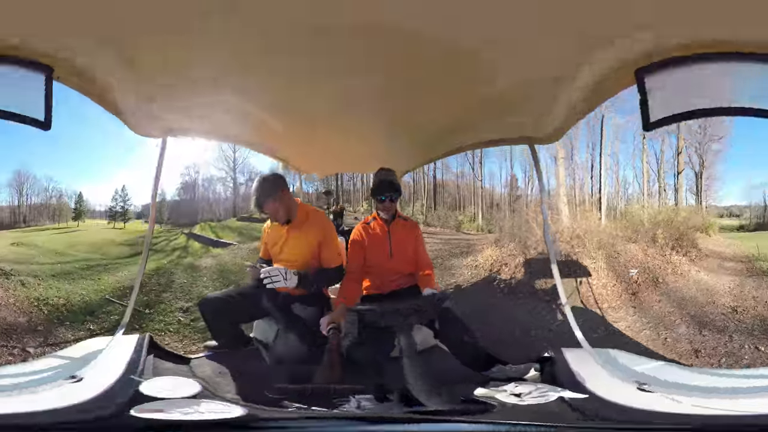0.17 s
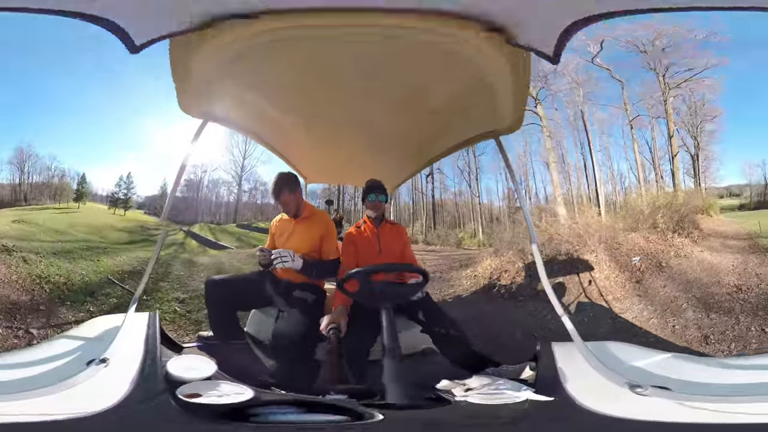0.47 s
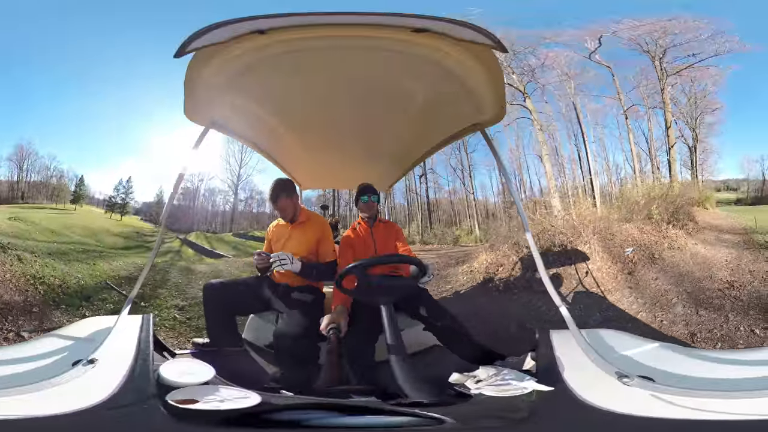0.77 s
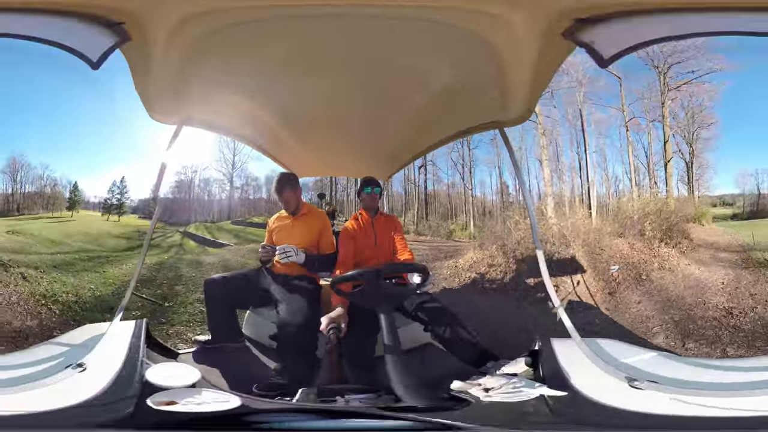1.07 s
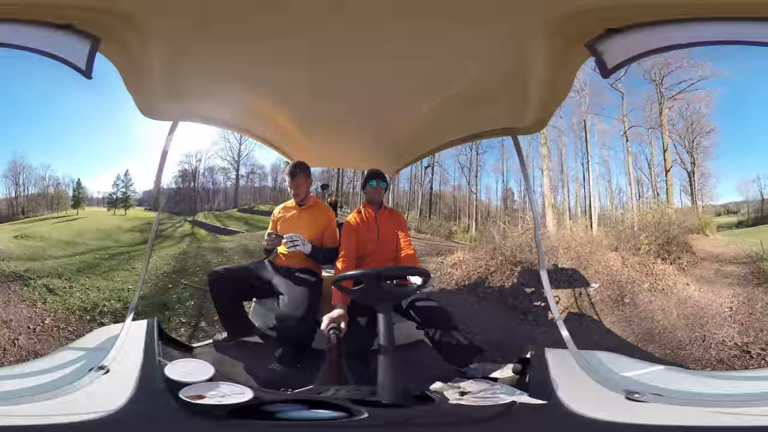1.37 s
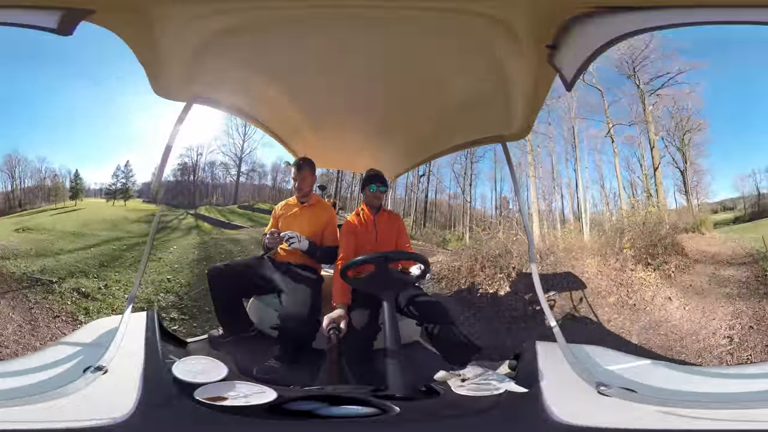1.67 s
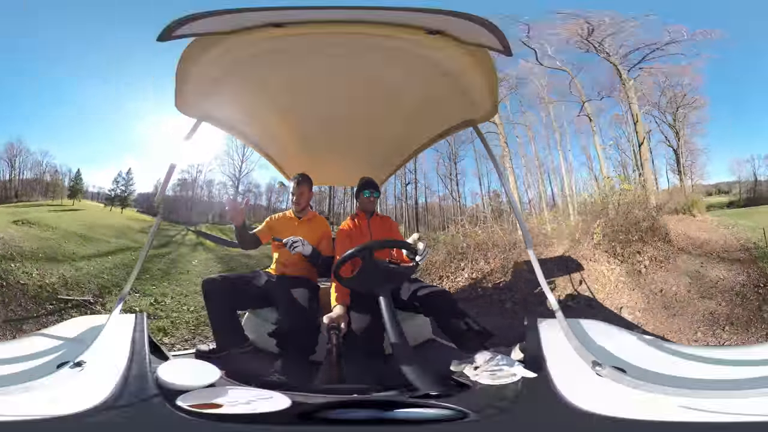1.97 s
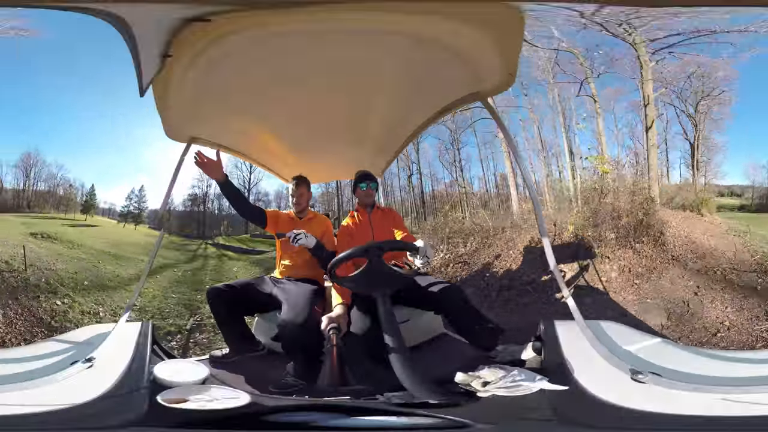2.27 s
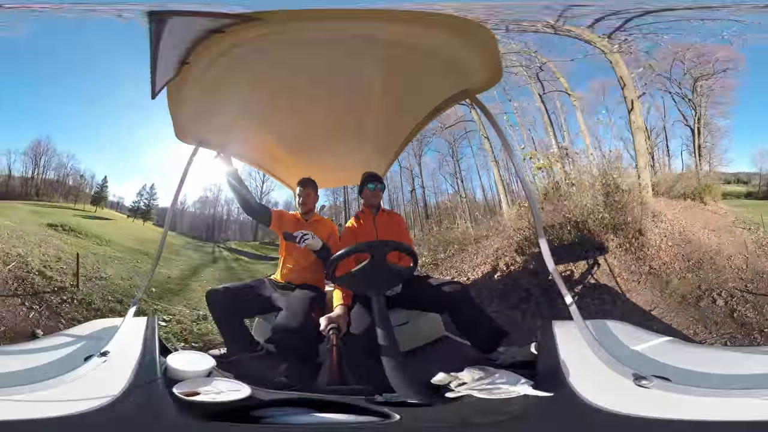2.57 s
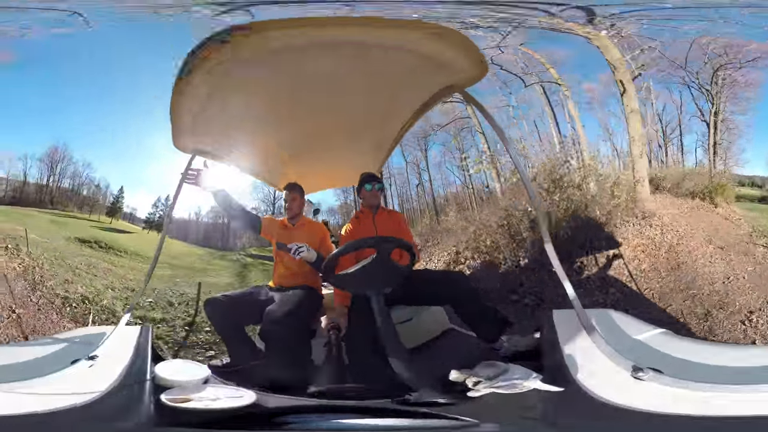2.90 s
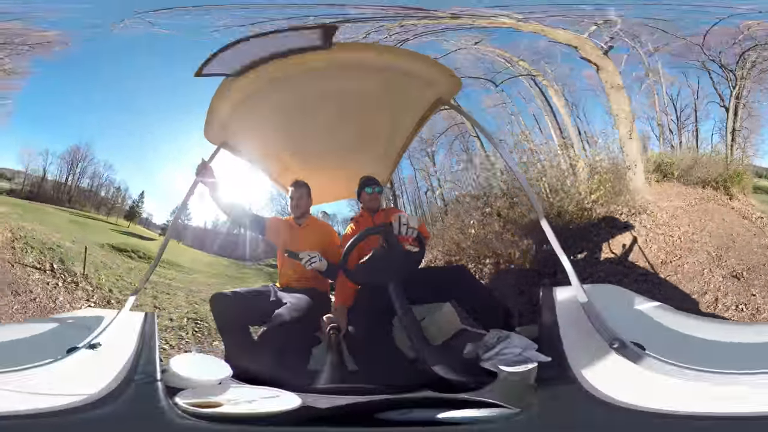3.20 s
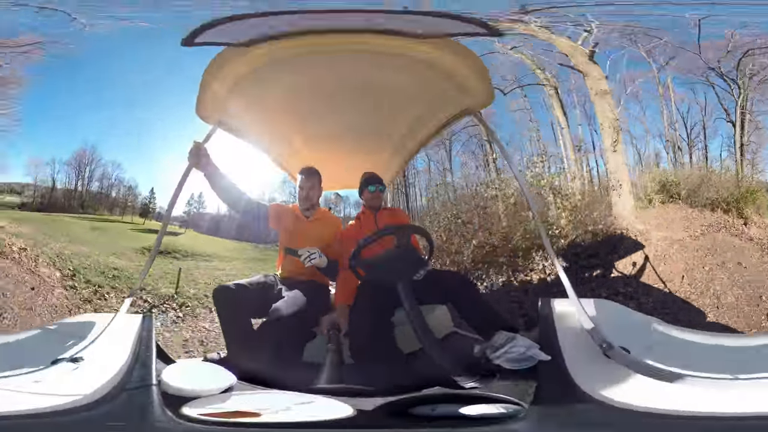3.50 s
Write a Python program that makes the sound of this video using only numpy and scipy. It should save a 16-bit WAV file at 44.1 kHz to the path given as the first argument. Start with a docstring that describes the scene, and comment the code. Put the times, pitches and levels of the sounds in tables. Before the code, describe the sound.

Petrol golf cart pulling away, metallic latch clatter, engine puffs, wind rumble and crackling twigs.

```python
"""A petrol golf cart pulls away on a leafy path, heard by a small camera's microphone on its dashboard.
Bursts of noise are the one-cylinder engine's puffs, quickening into a regular throb over a varying hiss.
Filtered impulses and short wavelets are wind buffeting the microphone in low thumps and flutters.
The brake latch clanks free as noise rattling a bank of decaying modes, with added rings; dense grains
rustle as leaves and running gear; coloured cracks with short rings are twigs and small parts.
"""
import sys
import numpy as np
from scipy import signal
from scipy.fft import rfft, irfft
from scipy.io import wavfile
from scipy.ndimage import uniform_filter1d, minimum_filter1d

SR = 44100
rng = np.random.default_rng(int(sys.argv[2]) if len(sys.argv) > 2 else 0)


def dump_mix(stems):
    """Bounce the given channels to the path in sys.argv[1] as a 16-bit WAV at rate SR."""
    frames = np.atleast_2d(stems).T  # one column per channel
    limited = np.clip(frames, -1, 1)  # hard clip at full scale
    pcm = np.round(limited * 32767).astype(np.int16)
    wavfile.write(sys.argv[1], SR, pcm)


N = 160965
TIME_S = np.arange(N) / SR

# colour of leaves and twigs: pitch_hz [Hz], level_db [dB, relative]
LEAF_COLOUR = [(590, -27), (1000, -15), (1290, -21.5), (1570, -8.5), (2250, -6), (2470, -6), (2870, -6.5),
               (3610, -12), (5480, 0), (7150, 2), (9120, -10.5), (10500, -14.5), (12200, -4), (15000, -9.5),
               (15900, -15)]


def undb(db):
    """Gain of a level in dB."""
    return 10 ** (np.asarray(db) / 20)


def unit(x):
    """Scaled to rms 1."""
    return x / np.sqrt(np.mean(x ** 2))


def curve(table, column):
    """A table column joined by straight lines in time."""
    rows = np.array(table)
    return np.interp(TIME_S, rows[:, 0], rows[:, column])


def band(x, hz, width_hz):
    """Zero-phase band-pass, so that each impulse swells and fades evenly."""
    low = np.sqrt(hz ** 2 + width_hz ** 2 / 4) - width_hz / 2
    band_pass = signal.butter(2, [low, low + width_hz], "band", fs=SR, output="sos")
    return signal.sosfiltfilt(band_pass, x)


def grains(per_s, scatter_db):
    """Random impulses, a few of them much larger than the rest."""
    hit = rng.random(N) < per_s / SR
    return hit * rng.standard_normal(N) * undb(scatter_db * rng.exponential(size=N))


def walk(rate_hz):
    """Slow random curve, spread 1."""
    step = int(SR / rate_hz)
    held = np.repeat(rng.standard_normal(N // step + 1), step)
    return unit(uniform_filter1d(held, step)[:N])


def colour(x, table):
    """Shapes the spectrum; white noise of rms 1 stays near rms 1."""
    rows = np.array(table)
    hz = np.arange(N // 2 + 1) * SR / N
    gain = undb(np.interp(np.log(hz + 1), np.log(rows[:, 0]), rows[:, 1]))
    return irfft(rfft(x) * unit(gain), N)


def swell(start_s, attack_s, hold_s, t60_s):
    """Envelope: straight attack, hold, exponential release that falls 60 dB in t60_s."""
    t = TIME_S - start_s
    release_s = np.clip(t - attack_s - hold_s, 0, 3)
    return np.clip(t / attack_s, 0, 1) * undb(-60 * release_s / t60_s)


def ring(start_s, hz, t60_s, attack_s):
    """One decaying mode: a sine under a swell without hold."""
    return swell(start_s, attack_s, 0, t60_s) * np.sin(2 * np.pi * hz * TIME_S)


def wavelets(table, cycles):
    """Each row a sine of random phase that swells and fades, `cycles` long at half height."""
    out = np.zeros(N + SR)
    for start_s, db, hz in table:
        shape = np.hanning(int(cycles * 2 / hz * SR))
        phase = 2 * np.pi * rng.random()
        tone = np.sin(2 * np.pi * hz * np.arange(len(shape)) / SR + phase)
        i = int(start_s * SR)
        out[i:i + len(shape)] += undb(db) * shape * tone
    return out[:N]


def wind():
    """Eddies of five sizes press on the microphone; the strongest stand out as thumps and flutters."""
    # rms of each eddy size in time: time_s [s], then five level_db [dB], largest eddies to finest
    eddy_levels = [(0.08, -35.5, -41, -58, -54, -58), (0.12, -38, -37.5, -61, -79, -65),
                   (0.15, -29, -34, -39, -65, -88), (0.19, -28.5, -31.5, -58, -66, -73),
                   (0.31, -33.5, -35.5, -46.5, -44.5, -51), (0.35, -26.5, -36.5, -61, -54.5, -54),
                   (0.39, -28.5, -29, -54, -66, -73), (0.46, -20, -26.5, -57, -59, -68),
                   (0.5, -16.5, -24.5, -33, -68, -73), (0.54, -22, -32, -45.5, -52, -60),
                   (0.6, -40, -14, -29.5, -51, -68), (0.65, -16, -20, -37, -44.5, -58),
                   (0.75, -52, -24, -39.5, -52.5, -80), (0.78, -30, -28, -24, -51, -52),
                   (0.8, -16, -34.5, -39, -53, -75), (0.84, -50, -21, -49, -51, -71),
                   (0.87, -47, -34, -53, -67, -63), (0.9, -23.5, -20, -27.5, -46, -67),
                   (0.94, -29, -30, -49, -64, -61), (0.98, -24, -34, -66, -53, -63),
                   (1.03, -40, -33.5, -23.5, -54, -66), (1.06, -30.5, -38, -38.5, -64, -64),
                   (1.22, -46.5, -44, -59.5, -56.5, -67), (1.37, -32.5, -25.5, -42, -54.5, -62.5),
                   (1.48, -32, -43, -45, -53, -63), (1.52, -23, -24, -23, -58, -58),
                   (1.55, -32, -25, -19, -18.5, -41.5), (1.6, -32, -29, -45, -35, -57),
                   (1.63, -36, -26.5, -30, -53, -75), (1.69, -25, -26.5, -43.5, -16.5, -35),
                   (1.71, -48, -36, -38.5, -61, -72), (1.74, -33, -45, -33, -38, -70),
                   (1.76, -25, -18, -29, -29.5, -42), (1.84, -29.5, -32, -24.5, -27.5, -43),
                   (1.89, -32.5, -19, -37.5, -56.5, -68), (2.1, -36, -37.5, -61.5, -55, -63),
                   (2.21, -32, -27, -54, -55, -63), (2.26, -25, -21.5, -22, -38.5, -52),
                   (2.34, -25, -27.5, -52, -59, -61.5), (2.38, -60, -31.5, -58, -51, -60),
                   (2.4, -37, -11.5, -51, -46, -40.5), (2.42, -24, -32, -36, -50, -80),
                   (2.48, -44, -24, -43, -59, -60.5), (2.51, -38, -18.5, -39.5, -49.5, -59),
                   (2.6, -34, -28, -51, -66, -70), (2.66, -34, -29, -43.5, -51, -65),
                   (2.74, -31, -36, -32.5, -63, -65), (2.79, -27, -19, -52, -48.5, -59),
                   (2.84, -25.5, -23.5, -47, -51, -78), (2.87, -17, -14, -38, -49, -50.5),
                   (2.89, -44, -22, -40, -54.5, -71), (3.03, -40.5, -38, -57, -61.5, -68),
                   (3.18, -45, -29.5, -49, -59, -58), (3.2, -27.5, -32, -42, -51, -57.5),
                   (3.29, -38.5, -27.5, -48.5, -63.5, -64), (3.37, -34, -29.5, -35, -49, -61),
                   (3.39, -28.5, -57, -64, -65, -65), (3.43, -48, -52, -56.5, -58, -63),
                   (3.63, -36, -36.5, -53.5, -58.5, -62), (3.65, -51, -47, -42, -46, -64)]
    # eddy sizes, one row per level column: centre_hz [Hz], width_hz [Hz]
    eddy_sizes = [(55, 95), (160, 158), (340, 210), (580, 288), (1050, 850)]
    # strongest single buffets: start_s [s], peak_db [dB], pitch_hz [Hz]
    thumps = [(0.14, -32.5, 134), (0.251, -25, 169), (0.398, -24, 134), (0.427, -18.5, 109.6),
              (0.465, -18.5, 144), (0.499, -22.5, 110), (0.577, -13, 132), (0.605, -10, 202),
              (0.646, -11.5, 144), (0.667, -27, 108), (0.698, -21, 110), (0.717, -15, 185),
              (0.768, -22, 160), (0.838, -17, 152), (0.89, -22, 181), (0.966, -15, 153),
              (1.009, -16.5, 205), (1.075, -27.5, 110), (1.104, -23, 181), (1.377, -11.5, 186),
              (1.43, -20.5, 164), (1.53, -13.5, 148), (1.554, -16, 142), (1.616, -15.5, 239),
              (1.658, -18, 173), (1.703, -18.5, 121), (1.78, -14, 152), (1.873, -23.5, 162),
              (1.921, -15.5, 161), (2.007, -17.5, 145), (2.064, -20, 122), (2.115, -22.5, 117),
              (2.179, -14.5, 169), (2.241, -19, 205), (2.28, -13, 144), (2.39, -9, 199), (2.447, -19, 187),
              (2.481, -18.5, 112.4), (2.508, -13, 171), (2.542, -20, 191), (2.647, -13.5, 146),
              (2.699, -15, 151), (2.793, -8.5, 150), (2.863, -18, 134), (2.916, -24, 183),
              (3.182, -27, 175), (3.235, -26.5, 129), (3.351, -18, 232), (3.55, -24.5, 144.7)]
    # quick flutters of small eddies: start_s [s], level_db [dB, before the trim], pitch_hz [Hz]
    flutters = [(0.145, -31, 398), (0.506, -33, 382), (0.565, -22.5, 412), (0.586, -23, 427),
                (0.611, -28, 393), (0.634, -42, 414), (0.673, -31, 377), (0.719, -27, 382),
                (0.77, -33, 370), (0.841, -30, 425), (0.904, -20.5, 377), (0.973, -30, 457),
                (1.027, -24, 387), (1.042, -39, 466), (1.077, -38, 377), (1.107, -39, 416),
                (1.381, -35, 384), (1.509, -27, 407), (1.54, -10.5, 460), (1.574, -24, 517),
                (1.613, -20, 441), (1.639, -22, 610), (1.668, -17.5, 570), (1.684, -23.5, 583),
                (1.722, -21.5, 433), (1.76, -15, 422), (1.788, -14.5, 590), (1.813, -14, 490),
                (1.839, -20, 366), (1.911, -32, 380), (2.226, -26.5, 450), (2.254, -19, 430),
                (2.392, -24, 450), (2.454, -38, 500), (2.513, -35, 442), (2.641, -33, 440),
                (2.703, -45, 375), (2.781, -32, 398), (2.868, -30, 460), (3.357, -23, 382),
                (3.484, -36, 596)]
    eddies_per_cycle, scatter_db = 5, 1.5
    thump_cycles, flutter_cycles, flutter_trim_db = 1.87, 1.5, -1.5

    eddies = np.zeros(N)
    for column, (hz, width_hz) in enumerate(eddy_sizes, start=1):
        gusts = unit(band(grains(eddies_per_cycle * hz, scatter_db), hz, width_hz))
        eddies += undb(curve(eddy_levels, column)) * gusts
    fluttering = undb(flutter_trim_db) * wavelets(flutters, flutter_cycles)
    return eddies + wavelets(thumps, thump_cycles) + fluttering


def rustle():
    """Leaves and running gear: dense fine grains whose level flickers, coloured as leaves."""
    # time_s [s], level_db [dB, before the flicker]
    rustle_levels = [(.08, -62), (.12, -84), (.2, -76), (.36, -55.5), (.5, -73), (.8, -73.5), (1.0, -60.5),
                     (1.2, -58), (1.5, -56), (1.6, -67), (1.75, -62), (1.88, -69), (2.1, -64), (2.3, -62),
                     (2.385, -72), (2.405, -77), (2.55, -66), (2.69, -64), (2.8, -58.5), (2.86, -60),
                     (2.89, -65), (3.04, -68), (3.14, -57.5), (3.2, -50.5), (3.27, -55.5), (3.33, -46),
                     (3.37, -56), (3.44, -65), (3.52, -51), (3.58, -51), (3.61, -45.5), (3.65, -48)]
    grains_per_s, scatter_db = 9000, 3.5
    flicker_db, flicker_hz = -1, 21
    level_db = curve(rustle_levels, 1) + flicker_db * walk(flicker_hz)
    return colour(undb(level_db) * unit(grains(grains_per_s, scatter_db)), LEAF_COLOUR)


def engine():
    """A puff of gas each firing, slow and separate, then a regular throb; the hiss rises and falls."""
    # puffs while it gathers speed: start_s [s], level_db [dB, before colouring]
    puffs = [(0.518, -53), (0.626, -55.5), (0.717, -57.5), (0.8, -54), (0.868, -56.5), (0.934, -54.5),
             (0.996, -55), (1.06, -56), (1.12, -53.5), (1.178, -51), (1.24, -55.5), (1.296, -52.5),
             (1.353, -56), (1.404, -54), (1.456, -55.5), (1.504, -51), (1.552, -84)]
    # hiss of engine and drive: time_s [s], level_db [dB]
    drive_levels = [(.08, -68.5), (.5, -65.5), (1.0, -71), (1.5, -59.5), (1.9, -63), (2.385, -60.5),
                    (2.405, -65.5), (3.0, -64.5), (3.65, -62.5)]
    # colour of the engine's gas: pitch_hz [Hz], level_db [dB, relative]
    gas_colour = [(530, -30), (900, 5), (1240, -12), (1470, 0), (2110, -0.5), (2300, -3.5), (2690, -0.5),
                  (3900, -10), (5520, -2.5), (7280, -1.5), (8620, -12), (10300, -5.5), (11200, -16),
                  (12700, -2.5), (15900, -11.5)]
    puff_attack_s, puff_hold_s, puff_t60_s = 0.0033, 0.005, 0.24
    running_hz, running_db = 19.85, -2  # throb: firing rate, level against the hiss

    starting = np.zeros(N)
    for start_s, db in puffs:
        starting += undb(db) * swell(start_s, puff_attack_s, puff_hold_s, puff_t60_s)

    last_puff_s = puffs[-1][0]
    one_puff = swell(0, puff_attack_s, puff_hold_s, puff_t60_s)
    since_firing_s = (TIME_S - last_puff_s) % (1 / running_hz)
    throb = np.interp(since_firing_s, TIME_S, one_puff)
    is_running = TIME_S > last_puff_s + 1 / running_hz
    hiss_db = curve(drive_levels, 1)
    running = is_running * throb * undb(hiss_db + running_db)
    return colour((starting + running + undb(hiss_db)) * rng.standard_normal(N), gas_colour)


def latch():
    """Each blow of the brake latch rattles briefly, shakes all the modes and adds a ring at its own pitch."""
    # blows: start_s [s], rattle_db [dB, before colouring], rattle_hold_s [s],
    # pitch_hz of the added ring [Hz], ring_db [dB]
    blows = [(0.084, -50.5, 0.004, 6100, -43), (0.223, -41.5, 0.0058, 3330, -45),
             (0.246, -61, 0.0085, 3200, -42.5), (.264, -26, 0.0094, 14100, -19),
             (.287, -50, 0.0034, 10020, -21.5), (0.291, -52, .004, 14050, -29),
             (0.299, -28.5, 0.0038, 11800, -24), (0.322, -27, 0.0038, 12030, -15),
             (0.365, -53, 0.0057, 4400, -53)]
    # modes of the latch: pitch_hz [Hz], level_db [dB, relative], t60_s [s]
    modes = [(663, -12, 0.045), (1110, -34, .04), (4435, -3, 0.063), (5060, -16, 0.13), (5510, 4, 0.026),
             (7800, -5, 0.075), (10100, -17, 0.042), (12600, -17, 0.036), (14200, -12, 0.029),
             (14600, 3, 0.017), (15700, 0, .008)]
    # colour of the rattle: pitch_hz [Hz], level_db [dB, relative]
    rattle_colour = [(290, -35), (500, -29), (570, -9.5), (668, -8), (750, -34), (1110, -9.5), (1400, -19),
                     (1550, -15.5), (2970, -10.5), (3530, -20), (4990, -4.5), (6670, -7.5), (7600, -1),
                     (8780, -15.5), (9720, -13), (10900, -18), (12300, -4), (12800, -12.5), (15900, -18.5)]
    rattle_attack_s, rattle_t60_s = 0.0031, 0.052
    ring_attack_s, ring_t60_s, body_db = 0.0046, 0.034, -13.5

    shaking, rings = np.zeros(N), np.zeros(N)
    for start_s, rattle_db, hold_s, hz, ring_db in blows:
        shaking += undb(rattle_db) * swell(start_s, rattle_attack_s, hold_s, rattle_t60_s)
        rings += undb(ring_db) * ring(start_s, hz, ring_t60_s, ring_attack_s)
    rattle = shaking * rng.standard_normal(N)

    t = np.arange(SR // 4) / SR
    body = np.zeros(len(t))
    for hz, db, t60_s in modes:
        mode = undb(db - 60 * t / t60_s) * np.sin(2 * np.pi * hz * t)
        body += mode / np.sqrt(t60_s * SR / 30)  # similar energy for long and short modes
    shaken = undb(body_db) * signal.fftconvolve(rattle, body)[:N]
    return colour(rattle, rattle_colour) + shaken + rings


def snaps():
    """Twigs and small parts: a short crack, dull or bright, a brief ring and a rustling tail."""
    # start_s [s], level_db [dB, before shaping], pitch_hz [Hz], tail_db [dB, relative],
    # brightness_db [dB, gain of the crack and tail above bright_hz]
    snap_rows = [(0.431, -51.5, 2580, -13, 0.5), (0.5344, -42, 2770, -12, -4), (1.031, -30, 7030, -21, 4),
                 (1.0358, -35.5, 8050, -17, 0.5), (1.0844, -39.5, 5980, -15, -2),
                 (1.108, -36, 4810, -22, -15), (1.1265, -39, 5200, -14, -14),
                 (1.183, -35.5, 5960, -13, -19), (1.1973, -33.5, 5070, -24, -3),
                 (1.553, -38.5, 2760, -23, 9), (1.771, -46, 7560, -31, 18), (2.0894, -47, 6810, -18, 7),
                 (2.147, -49, 2620, -14, 11), (2.203, -47, 2680, -7, 3), (2.2762, -44.5, 3360, -9, 8),
                 (2.282, -48, 5930, -18, -4), (2.346, -41.5, 6820, -12, 0.5), (2.4338, -50, 5540, -18, 0.5),
                 (2.4957, -42, 7800, -18, 5), (2.56, -57, 2680, -18, -1), (2.7032, -40, 7440, -11, -9),
                 (2.7142, -33.5, 4970, -10, -9), (2.7322, -28.5, 6590, -17.5, -2.5),
                 (2.782, -34, 5890, -17.5, 3), (2.8048, -43, 2510, -12, -1), (2.8857, -44, 7100, -30, -2),
                 (2.93, -36.5, 6570, -19, 1), (2.9491, -34, 5170, -22.5, 8), (3.0506, -46, 5530, -11, 5),
                 (3.0614, -48, 5470, -23, 11), (3.1216, -39, 7250, -13, -12),
                 (3.1531, -24.5, 5800, -20.5, 4), (3.1575, -31.5, 7140, -15, 4),
                 (3.2181, -32, 6630, -20, 3), (3.2254, -32, 6900, -20, -11), (3.2444, -38, 6500, -28, -11),
                 (3.277, -39, 7260, -11.5, -1), (3.2884, -27.5, 7540, -18.5, 8),
                 (3.3094, -46, 7440, -17, -1), (3.3683, -34.5, 2740, -19, -7), (3.3955, -39, 4860, -9, 3.5)]
    crack_attack_s, crack_t60_s = 0.0002, 0.0078
    tail_attack_s, tail_t60_s = 0.0026, 0.098
    ring_attack_s, ring_t60_s, ring_db = 0.00049, 0.016, -5.5
    bright_hz = 9000

    plain, bright, rings = np.zeros(N), np.zeros(N), np.zeros(N)
    for start_s, db, hz, tail_db, brightness_db in snap_rows:
        crack = swell(start_s, crack_attack_s, 0, crack_t60_s) / 2
        tail = undb(tail_db) * swell(start_s, tail_attack_s, 0, tail_t60_s)
        shape = undb(db) * (crack + tail)
        plain += shape
        bright += undb(brightness_db) * shape
        rings += undb(db + ring_db) * ring(start_s, hz, ring_t60_s, ring_attack_s)

    noise = rng.standard_normal(N)
    high_pass = signal.butter(2, bright_hz, "high", fs=SR, output="sos")
    # only the treble takes each snap's own brightness
    cracks = plain * noise + signal.sosfiltfilt(high_pass, (bright - plain) * noise)
    return colour(cracks, LEAF_COLOUR) + rings


def clicks():
    """Bare clicks among the hardest buffets: single impulses dulled by a gentle low-pass."""
    # start_s [s], level_db [dB, before gain and low-pass]
    click_rows = [(0.6514, -51), (1.5632, -34.5), (1.7865, -34), (2.3929, -21), (2.873, -44)]
    gain_db, dull_hz = 7, 3000
    impulses = np.zeros(N)
    for start_s, db in click_rows:
        impulses[int(start_s * SR)] = undb(db + gain_db)
    dulled = signal.lfilter(*signal.butter(1, dull_hz, fs=SR), impulses)
    return dulled * SR / (2 * np.pi * dull_hz)  # makes up height lost in the low-pass


def scene():
    """All layers together, silent until the sound begins."""
    begins_s = 0.072
    total = wind() + rustle() + engine() + latch() + snaps() + clicks()
    return (total * swell(begins_s, .002, 9, 1))[None]


def record(dry):
    """The camera's limiter eases down around the hardest buffets; a steep low-pass cuts the top."""
    ceiling, ease_s, top_hz = 0.32, 0.011, 15900
    window = int(ease_s * SR)
    needed = np.minimum(1, ceiling / (np.abs(dry) + 1e-9))
    gain = uniform_filter1d(minimum_filter1d(needed, window), window)
    low_pass = signal.ellip(10, .2, 60, top_hz, fs=SR, output="sos")
    return signal.sosfilt(low_pass, gain * dry)


dry = scene()
out = record(dry)
dump_mix(out)
```